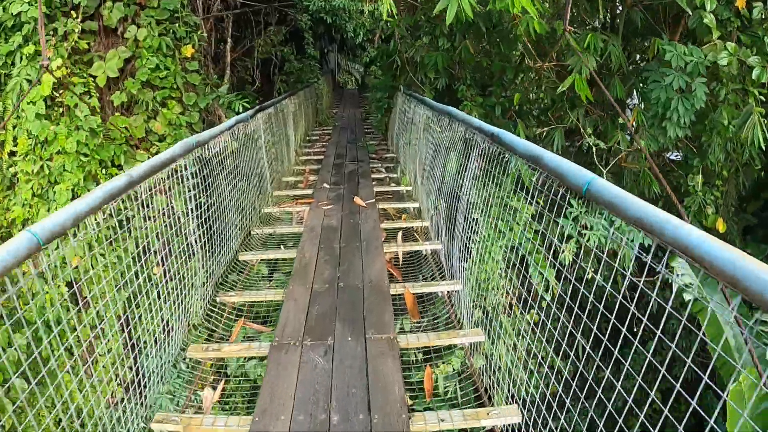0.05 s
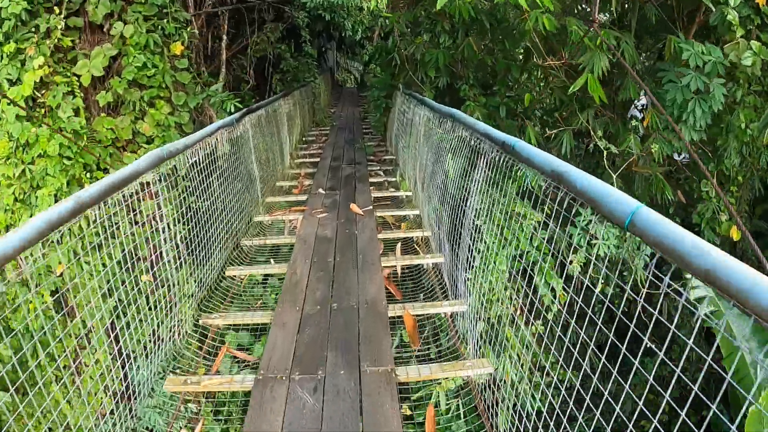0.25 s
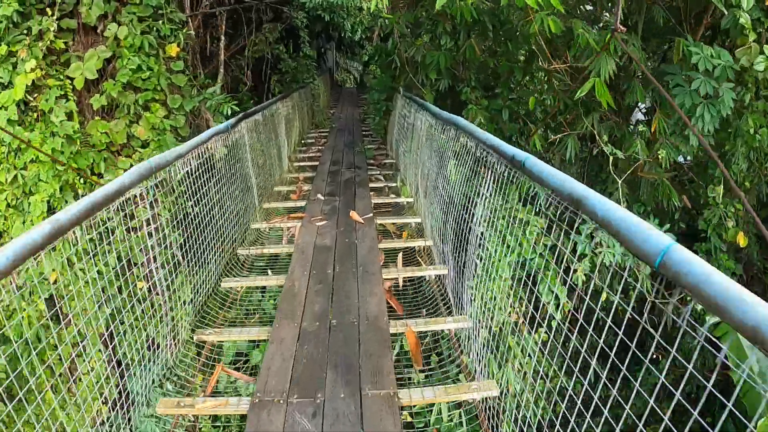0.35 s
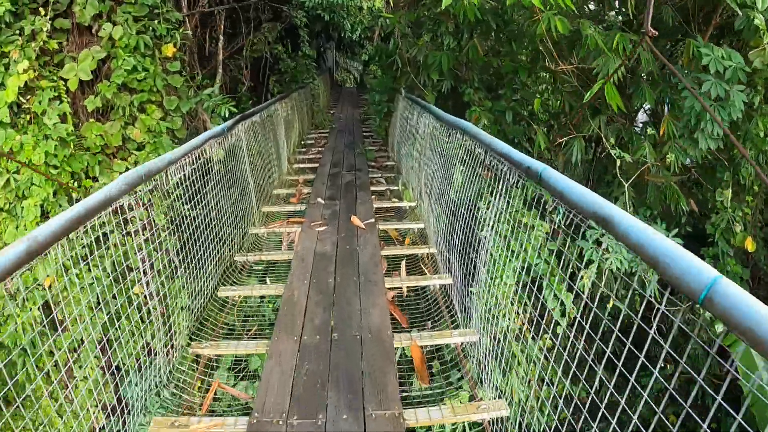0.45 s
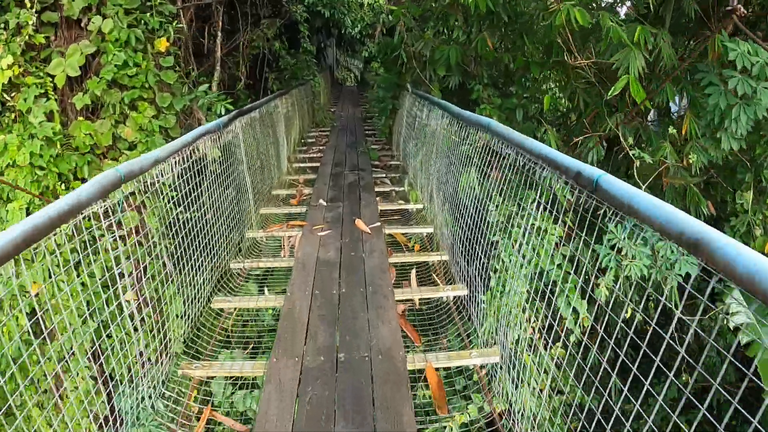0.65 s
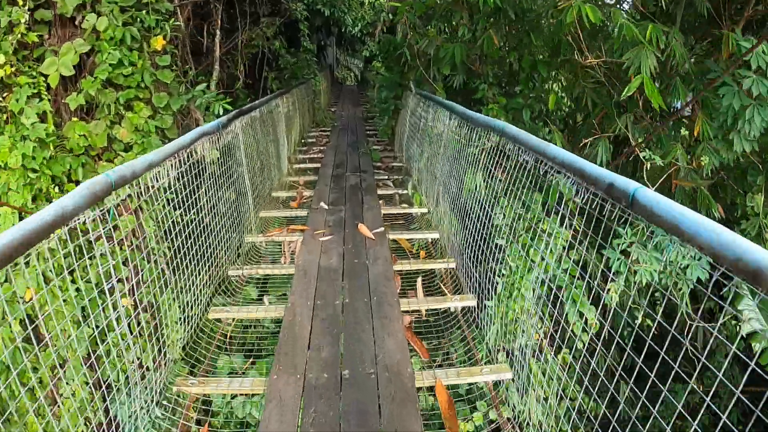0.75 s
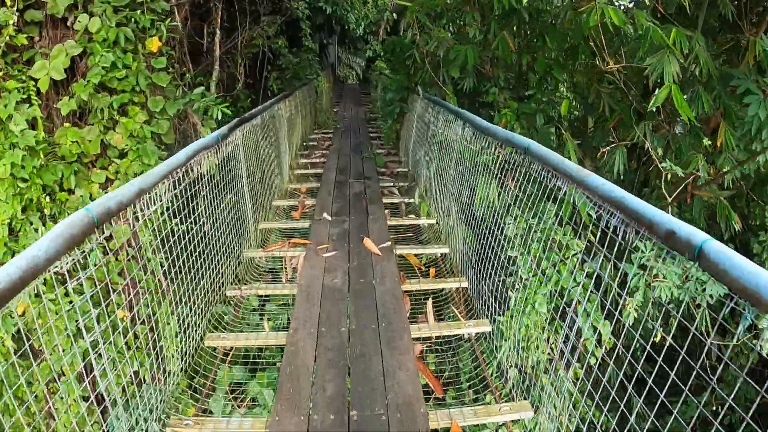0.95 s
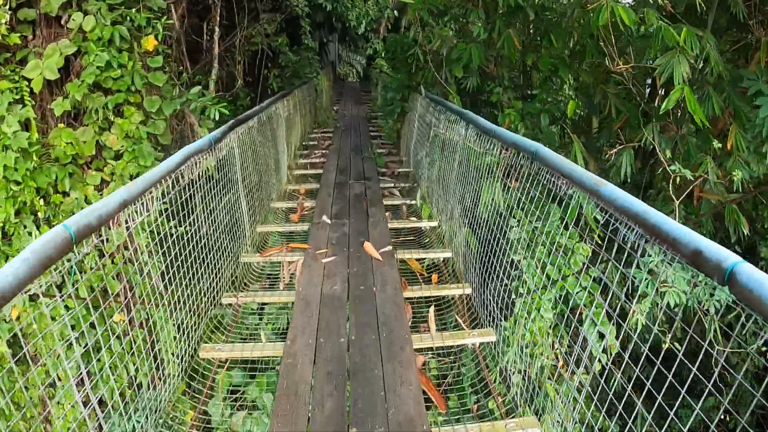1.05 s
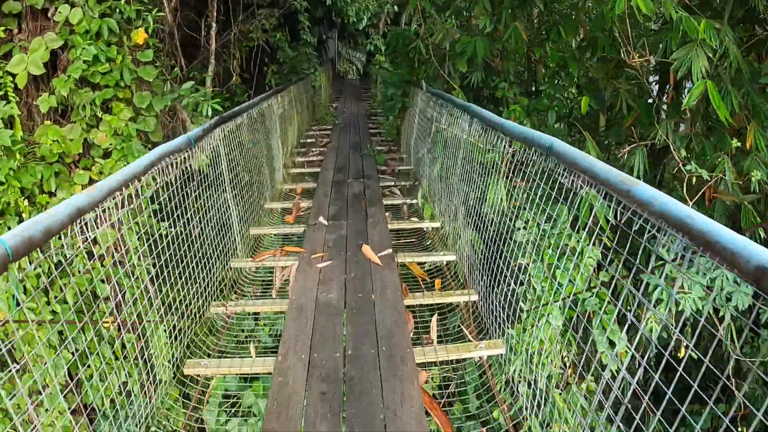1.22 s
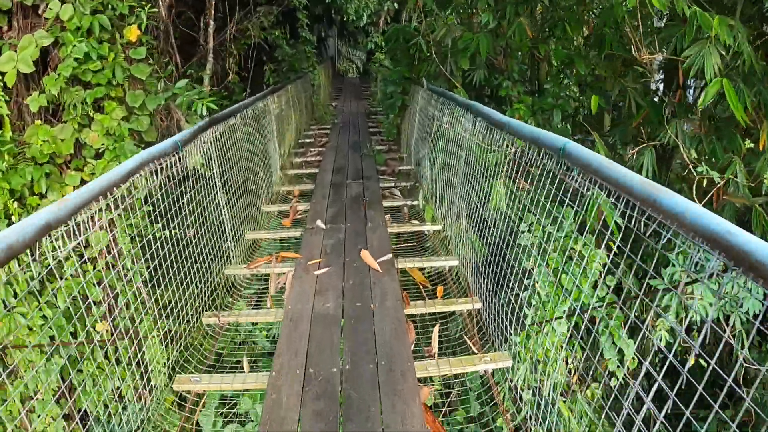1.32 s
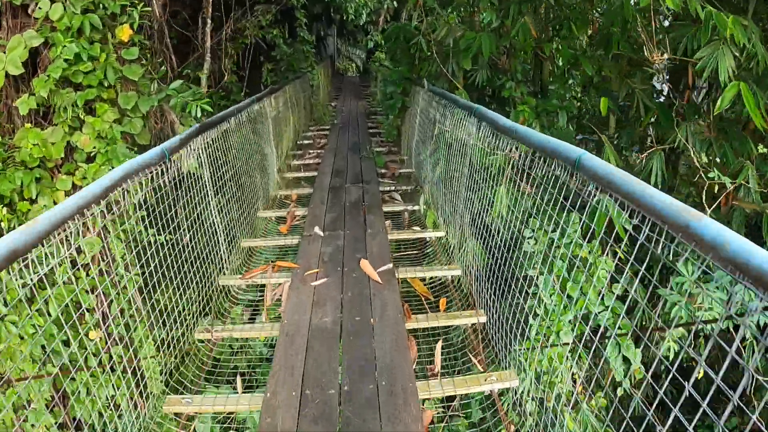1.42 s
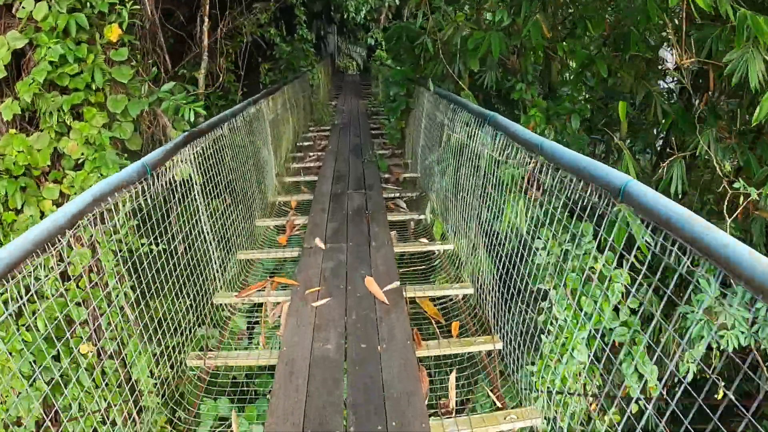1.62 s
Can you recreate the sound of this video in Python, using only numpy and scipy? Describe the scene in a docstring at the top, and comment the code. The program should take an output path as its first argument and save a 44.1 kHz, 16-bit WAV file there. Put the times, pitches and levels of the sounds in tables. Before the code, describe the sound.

Footsteps knock on loose wooden planks of a hanging footbridge while forest insects sing steadily

```python
"""Shoes knock on the wooden planks of a hanging footbridge; the boards thud and chatter on their bearers. A
rail fitting tocks, a hand slides along the left rail, ringing the tube and rubbing with a broad hiss, and the
loaded deck murmurs. The swaying deck sends low lumps into the hand-held microphones; around it, insects sing in
two fuzzy bands with a faint thin third, and a far bird whistles once. Knocks, tocks and rail are sums of
decaying sine modes; the rest but the bird, a gliding sine, is shaped noise. Knocks, tocks and bird scatter into
forest echoes."""
import sys
import numpy as np
from scipy import signal
from scipy.fft import rfft, irfft
from scipy.io import wavfile
from scipy.ndimage import uniform_filter1d

SR = 44100
rng = np.random.default_rng(int(sys.argv[2]) if len(sys.argv) > 2 else 0)


def materialize(psi):
    """Save the field psi as 16-bit PCM at rate SR to the path in sys.argv[1].

    A 1-D psi becomes a single channel; in a 2-D psi each row is a channel.
    """
    bounded = np.clip(np.atleast_2d(psi).T, -1, 1)
    quanta = np.round(bounded * 32767).astype(np.int16)
    wavfile.write(sys.argv[1], SR, quanta)


N = 74970  # samples, 1.7 s
WIDE_HZ = 670  # high-pass corner for the echoes, the direct tocks and the spread part of the knocks


def amp(db):
    """Decibels to linear gain."""
    return 10 ** (np.asarray(db) / 20)


def unit(x):
    """Scale to an RMS of one."""
    return x / np.sqrt(np.mean(x ** 2) + 1e-20)


def read(points, hz):
    """Read a spectrum curve between its points, on a log frequency axis."""
    f, value = np.transpose(points)
    return np.interp(np.log(hz + 1), np.log(f + 1), value)


def curve(points, order=1):
    """Draw one column of a time table as straight lines over the whole scene."""
    rows = np.transpose(points)
    return np.interp(np.arange(N) / SR, rows[0], rows[order])


def sides(db):
    """Left and right gains for a given left-minus-right level."""
    return amp([[db / 2], [-db / 2]])


def blend(first, second, likeness):
    """Mix two independent noises of equal power so that the result resembles the first by the likeness."""
    return likeness * first + np.sqrt(1 - likeness ** 2) * second


def add(mix, start_s, sound):
    """Lay a sound into the mix at its start time, cut at the end of the scene."""
    part = mix[..., round(start_s * SR):][..., :sound.shape[-1]]
    part += sound[..., :part.shape[-1]]


def high(x, hz):
    """Gentle second-order high-pass."""
    return signal.lfilter(*signal.butter(2, hz, "high", fs=SR), x)


def grains(count, per_s, spread_db):
    """Sparse taps of random sign and size."""
    size = amp(spread_db * np.minimum(rng.exponential(1, count), 3))
    happens = rng.random(count) < per_s / SR
    return unit(happens * size * rng.choice([-1, 1], count))


def ring(modes, t, weights):
    """Sum of struck modes, each a sine that dies away at its own rate."""
    return sum(weight * amp(level_db - 60 * t / t60_s) * np.sin(2 * np.pi * hz * t)
               for weight, (hz, level_db, t60_s) in zip(weights, modes))


def hiss(shape, same, patchy_db):
    """Two-channel noise of a given shape(hz) gain and same(hz) likeness, with drifting patches."""
    hz = np.fft.rfftfreq(1024, 1 / SR)
    a, b, c, d, patch = rng.standard_normal((N // 256 + 5, 513, 5)).T
    # smoothing over neighbouring bins and frames makes the level drift in patches
    patch = uniform_filter1d(patch, size=12, axis=0)
    patch = unit(uniform_filter1d(patch, size=10, axis=1))
    likeness = np.clip(same(hz) * np.ones(513), -1, 1)[:, None]
    left = a + 1j * b
    right = blend(left, c + 1j * d, likeness)
    spectrum = np.array([left, right]) * shape(hz)[:, None] * amp(patchy_db * patch)
    return unit(signal.istft(spectrum, nperseg=1024, noverlap=768)[1][:, :N])


def forest(x):
    """Scattered echoes from trees and mesh: sparse decaying taps, partly other ones for each side."""
    t60_s, likeness = 0.58, 0.92
    at = 200 + np.arange(0, SR // 2, 20) + rng.integers(0, 20, (2, SR // 40 + 1))
    taps = np.zeros((2, SR // 2 + 300))
    tap_sizes = rng.choice([-1., 1.], at.shape) * amp(-60 * at / SR / t60_s)
    np.put_along_axis(taps, at, tap_sizes, 1)
    taps[1] = blend(taps[0], taps[1], likeness)
    taps = taps / np.linalg.norm(taps[0])
    return signal.fftconvolve(high(x, WIDE_HZ)[None], taps, axes=1)[:, :N]


def board_knock(t, boards, knock_db, chatter_db):
    """A gritty contact rings the board modes, then loose boards chatter out as many tiny taps."""
    detune, board_low_hz = 0.043, 110
    contact_decay_s, contact_grit = 0.0048, 0.49
    chatter_per_s, chatter_t60_s, chatter_spread_db = 1500, 0.28, 6
    # every blow meets slightly different mode pitches and signs
    tune = 1 + detune * rng.uniform(-1.09, 1, len(boards))
    modes = [(hz * k, level_db, t60_s) for k, (hz, level_db, t60_s) in zip(tune, boards)]
    board = ring(modes, t[:6000], rng.choice([-1, 1], len(boards)))
    board = board / abs(board).max()
    contact = rng.standard_normal(len(t)) * np.exp(-t / contact_decay_s)
    grit = contact_grit * contact / np.linalg.norm(contact)
    knock = amp(knock_db) * ((t == 0) + grit)  # one sharp tap plus the grit
    fade = amp(chatter_db - 60 * t / chatter_t60_s)
    chatter = grains(len(t), chatter_per_s, chatter_spread_db) * fade / np.linalg.norm(board)
    return high(signal.fftconvolve(knock + chatter, board)[:len(t)], board_low_hz)


def board_thud(t, pitch_hz, level_db, t60_s):
    """Two low bending modes beat against each other after a soft rise."""
    rise_s, pair_ratio, pair_db = 0.0038, .84, -6.5
    pair = (pitch_hz * pair_ratio, level_db + pair_db, t60_s)
    thud = ring([(pitch_hz, level_db, t60_s), pair], t, [1, 1])
    return thud * (1 - np.exp(-t / rise_s))


def board_crack(t, level_db, t60_s):
    """A burst of bright noise with a quick decay and a quieter gritty tail."""
    likeness, rise_s = 0.47, 0.00027
    grit_db, grit_t60_s = -21, 0.47
    # spectrum of the crack: pitch_hz [Hz], density_db [dB per Hz]
    crack_colour = [(880, -6.5), (1500, -0.5), (3000, -5.5), (5500, -18.5), (7400, -23), (8500, -26),
                    (10500, -38), (12500, -46), (15500, -78)]
    hz = np.fft.rfftfreq(len(t), 1 / SR)
    colour = amp(read(crack_colour, hz)) * (hz > 800)
    noise = unit(irfft(rfft(rng.standard_normal((2, len(t)))) * colour))
    noise[1] = blend(noise[0], noise[1], likeness)
    decay = amp(-60 * t / t60_s) + amp(grit_db - 60 * t / grit_t60_s)
    return noise * amp(level_db) * decay * (1 - np.exp(-t / rise_s))


def steps():
    """Each blow layers ringing and chattering boards, a low thud and a crack, with forest echoes."""
    echo_db = -13.5
    # blows on the boards: start_s [s], knock_db [dB], thud_db [dB], thud_hz [Hz], thud_t60_s [s],
    # crack_db [dB], crack_t60_s [s], chatter_db [dB], pan_db [dB, left minus right]
    blows = [(.2230, -15, -39, 202, .1, -30, 0.024, -20, 2.5),
             (0.2264, -11, -21.5, 261.7, 0.39, -13, 0.022, -22.5, 1),
             (0.2287, -38, -54, 60.5, 0.13, -19, 0.012, -40, 1),
             (.2300, -9.5, -11.5, 132.6, 0.31, -29, 0.0071, -21.5, -4.5),
             (0.249, -32, -44, 207.5, 0.09, -39, .03, -23.5, 0),
             (0.271, -22, -41, 249, 0.14, -34, .03, -31, -4.5),
             (.304, -18.5, -33, 141.7, 0.4, -35.5, .02, -35, -1),
             (.405, -55.5, -34, 133.5, 0.25, -47.5, 0.076, -49.5, 12.5),
             (0.468, -56, -44.5, 130, 0.6, -49.5, 0.027, -42, 5),
             (.534, -47, -39.5, 232, 0.085, -73, 0.032, -47, 8.5),
             (0.713, -69, -48, 186, 0.3, -79, .03, -58, 5), (0.784, -43, -38, 178, 0.16, -70, 0.05, -46, 1),
             (.845, -22.5, -28.5, 110, 0.35, -36, 0.039, -39, 6.5),
             (.860, -31, -31.5, 133.1, 0.62, -39.5, 0.046, -24.5, -3),
             (0.8926, -19, -20.5, 171, 0.16, -31.5, 0.043, -32.5, 1),
             (.954, -21.5, -18, 176, 0.1, -35.5, 0.11, -31, 3),
             (.998, -39, -32, 110, 0.28, -43, .04, -34.5, 3),
             (1.039, -22, -24, 303, 0.043, -40, 0.045, -49, -1),
             (1.064, -27.5, -31.5, 176, .2, -46, .03, -49, 6),
             (1.105, -55, -34, 122.2, 0.42, -48, 0.036, -45, -5),
             (1.20, -66, -43.5, 168.4, 0.46, -62, 0.025, -48.5, -7),
             (1.357, -40.5, -61, 302, 0.057, -45, .04, -38.5, 1.5),
             (1.363, -38, -23, 340, 0.031, -58, 0.028, -48, 5),
             (1.378, -59, -36.5, 170, 0.31, -55, 0.034, -70, 1),
             (1.407, -45, -30, 171.4, 0.14, -70, .03, -46.5, -4),
             (1.513, -61, -34.5, 296, 0.056, -59, 0.026, -55, 3),
             (1.633, -44, -50, 320, 0.23, -63, .03, -90, -3)]
    # ringing modes of the boards: pitch_hz [Hz], level_db [dB], t60_s [s]
    boards = [(202.5, -2, 0.14), (252, -4.5, 0.078), (323, -5.5, 0.097), (397.8, -6, 0.063),
              (526.5, -10, 0.046), (619.6, -7, 0.059), (754, -1.5, 0.024), (936, -3.5, 0.042),
              (1075, -3.5, 0.037), (1273, 2, 0.044), (1450, -8.5, 0.06), (1820, 3, 0.0073),
              (2220, -18, 0.0089), (2746, -4.5, 0.015), (3416, -3, 0.04)]
    out, t = np.zeros((2, N)), np.arange(SR // 2) / SR
    for start_s, knock_db, thud_db, thud_hz, thud_t60_s, crack_db, crack_t60_s, chatter_db, pan_db in blows:
        body = board_knock(t, boards, knock_db, chatter_db)
        thud = board_thud(t, thud_hz, thud_db, thud_t60_s)
        crack = board_crack(t, crack_db, crack_t60_s)
        # well above WIDE_HZ the direct knock is left with the pan gains minus one: opposite signs per side
        spread = high(body, WIDE_HZ) * (sides(pan_db) - 2)
        add(out, start_s, body + thud + spread + crack * sides(pan_db))
    return out + amp(echo_db) * forest(out.mean(0))


def tocks():
    """Short hollow rings of a rail fitting, the main mode driven for a few ms, that hang on in the echoes."""
    pan_db, echo_db, rise_s = 2.5, -3.5, 0.0004
    # tocks: start_s [s], level_db [dB], pitch factor [ratio], hold_s [s], level_db of the other modes [dB]
    tock_hits = [(0.172, -37.5, 1.09, 0.0039, -1), (1.6526, -30.5, 1.0, 0.002, 4),
                 (1.6566, -24.5, 0.99, 0.0055, -4)]
    # modes of the fitting, main one first: pitch_hz [Hz], level_db [dB], t60_s [s]
    tock_modes = [(1381, 0.5, 0.0057), (1190, -1, 0.017), (1490, -15, 0.0073), (1930, -10, 0.018),
                  (2820, -4.5, 0.022), (3340, -2, 0.013)]
    dry, t = np.zeros(N), np.arange(3000) / SR
    for start_s, level_db, tune, hold_s, others_db in tock_hits:
        tock = np.zeros(len(t))
        for k, (hz, mode_db, t60_s) in enumerate(tock_modes):
            # the main mode holds before it decays; the others decay at once
            decay_time = t if k else np.maximum(t - hold_s, 0)
            envelope = amp(mode_db + others_db * (k > 0) - 60 * decay_time / t60_s)
            tock += envelope * np.sin(2 * np.pi * tune * hz * t)
        add(dry, start_s, amp(level_db) * tock * np.minimum(t / rise_s, 1))
    return (high(dry, WIDE_HZ) + amp(echo_db) * forest(dry)) * sides(pan_db)


def rail():
    """Dense little slips of the palm ring the rail tube, much louder on the left."""
    slips_per_s, slip_spread_db, pan_db = 2200, 3, 13.5
    # loudness of the sliding hand: start_s [s], level_db [dB]
    slide = [(0, -58.5), (.2, -64.5), (.3, -70), (.735, -73), (.77, -51.5), (.9, -51), (1.1, -50.5),
             (1.25, -53.5), (1.33, -48), (1.375, -50), (1.41, -58.5)]
    # modes of the rail tube: pitch_hz [Hz], level_db [dB], t60_s [s]
    tube_modes = [(449, -5, 0.057), (1595, 0.5, 0.035), (1800, 7, 0.016), (2230, -2, 0.014),
                  (2670, -10.5, 0.013)]
    tube = ring(tube_modes, np.arange(2000) / SR, np.ones(len(tube_modes)))
    rub = []
    for side in "LR":
        slips = grains(N, slips_per_s, slip_spread_db)
        rub.append(unit(signal.fftconvolve(slips, tube)[:N]))
    return np.array(rub) * amp(curve(slide)) * sides(pan_db)


def palm_rub():
    """The palm rubs along the left rail: patchy noise above 500 Hz that swells and sinks, louder on the left."""
    likeness, pan_db = 0.2, 7
    # loudness of the rub: start_s [s], level_db [dB]
    swish = [(0, -59.5), (.08, -54.5), (.15, -46.5), (.21, -56), (.33, -56), (.42, -46.5), (.47, -60),
             (.6, -51.5), (.65, -68), (.73, -75), (.76, -54), (1.1, -61), (1.22, -69), (1.29, -48.5),
             (1.36, -86), (1.43, -53), (1.47, -50.5), (1.56, -51), (1.62, -60), (1.7, -49)]
    # spectrum of the rub: pitch_hz [Hz], density_db [dB per Hz]
    rub_colour = [(500, -18), (800, -23), (1330, -11), (1940, -20), (2600, -10), (4400, -20), (6700, -20),
                  (10000, -43.5), (15500, -76)]
    rub_hiss = hiss(lambda f: amp(read(rub_colour, f)) * (f > 500), lambda f: likeness, patchy_db=4.5)
    return amp(curve(swish)) * sides(pan_db) * rub_hiss


def deck_murmur():
    """The deck murmurs under load: low-mid noise, nearly the same on both sides."""
    # loudness of the murmur: start_s [s], level_db [dB]
    murmur = [(0.0, -60), (0.178, -50), (0.336, -43.5), (0.382, -48.5), (0.538, -80), (0.776, -56.5),
              (0.832, -44.5), (0.956, -43.5), (1.026, -56), (1.136, -48), (1.334, -52.5), (1.49, -59),
              (1.7, -54)]
    # spectrum of the murmur: pitch_hz [Hz], density_db [dB per Hz]
    deck_colour = [(50, -53), (110, -11.5), (180, 1.5), (400, 0.5), (550, -10.5), (1200, -14), (2500, -42)]
    deck = hiss(lambda f: amp(read(deck_colour, f)), lambda f: .97, patchy_db=2.0)
    return amp(curve(murmur)) * deck


def sway_lumps():
    """The swaying deck lumps in the hand-held microphones: deep noise that surges and sinks."""
    corner_hz, likeness = 43.8, 0.82
    # loudness of the low lumps: start_s [s], level_db [dB]
    lumps = [(0.0, -65), (0.084, -38), (0.136, -54), (0.246, -29.5), (0.274, -47), (0.33, -38),
             (0.748, -68.5), (0.776, -47), (0.818, -48), (0.904, -49), (0.96, -40.5), (1.06, -55),
             (1.136, -51), (1.178, -65), (1.324, -68), (1.368, -49), (1.67, -79), (1.7, -76)]
    sway = hiss(lambda f: (f > 22) / (1 + (f / corner_hz) ** 4), lambda f: likeness, patchy_db=1.7)
    return amp(curve(lumps)) * sway


def insects():
    """Many far singers blur into fuzzy, slightly throbbing bands of noise."""
    throb_db, skirt = 1.5, 2.68  # skirt: steepness of the band edges
    # insect bands: pitch_hz [Hz], width_hz [Hz], level_db [dB], pan_db [dB, left minus right],
    # left-right likeness [0-1]
    choirs = [(4417, 660, -52, 0.7, 0.4), (6727, 540, -52.5, 1.3, 0.18), (7500, 100, -72, -13.5, 0.19)]
    out = np.zeros((2, N))
    for hz, width_hz, level_db, pan_db, likeness in choirs:
        song = hiss(lambda f: 1 / (1 + abs((f - hz) / width_hz * 2) ** skirt), lambda f: likeness, throb_db)
        out += amp(level_db) * sides(pan_db) * song
    return out


def bird():
    """A faint falling whistle, one gliding sine with echoes."""
    echo_gain = .55
    # glide of the whistle: start_s [s], pitch_hz [Hz], level_db [dB]
    whistle = [(.395, 5600, -64), (.42, 4750, -58), (.445, 4050, -57), (.475, 3620, -58), (.5, 3350, -58),
               (.525, 3200, -59), (.545, 3160, -68)]
    t = np.arange(N) / SR
    on = (t > whistle[0][0]) & (t < whistle[-1][0])
    phase = 2 * np.pi * np.cumsum(curve(whistle)) / SR
    tone = on * amp(curve(whistle, order=2)) * np.sin(phase)
    return tone + echo_gain * forest(tone)


def air_noise():
    """A soft, wide bed of air: steady noise with drifting patches."""
    level_db = -62.5
    # spectrum of the air: pitch_hz [Hz], density_db [dB per Hz]
    air_colour = [(60, 3), (420, -18), (620, -19), (1500, -22), (2800, -15.5), (5300, -35), (8300, -21),
                  (10500, -27.5), (13000, -64), (15500, -82)]
    # width of the air: pitch_hz [Hz], left-right likeness [0-1]
    air_same = [(60, 0.27), (500, 0.57), (2000, 0.37), (5000, 0.13), (12000, 0.035)]
    return amp(level_db) * hiss(lambda f: amp(read(air_colour, f)), lambda f: read(air_same, f), patchy_db=-3.0)


def scene():
    """All the layers together, from the footsteps back to the air."""
    bridge = steps() + tocks() + rail() + palm_rub() + deck_murmur() + sway_lumps()
    return bridge + insects() + bird() + air_noise()


def record(dry):
    """The loudest peaks are rounded off; then the band limit."""
    ceiling, edge_hz = .5, 15400
    soft = ceiling * np.tanh(dry / ceiling)
    band_limit = signal.firwin(511, edge_hz, window=("kaiser", 12), fs=SR)
    return signal.oaconvolve(soft, band_limit[None], "same")


dry = scene()
out = record(dry)
materialize(out)
```